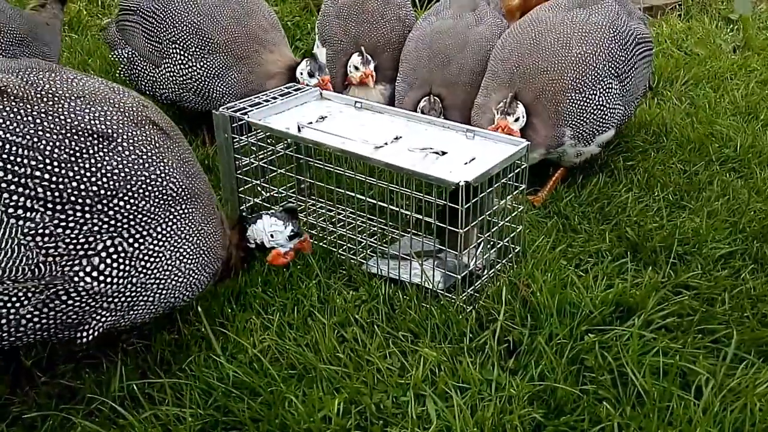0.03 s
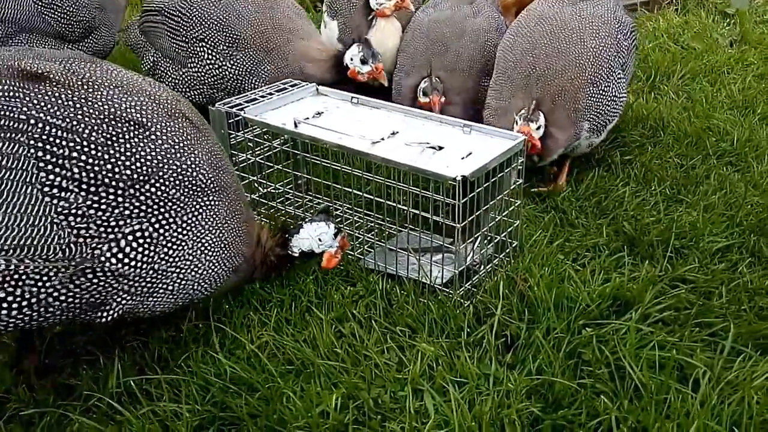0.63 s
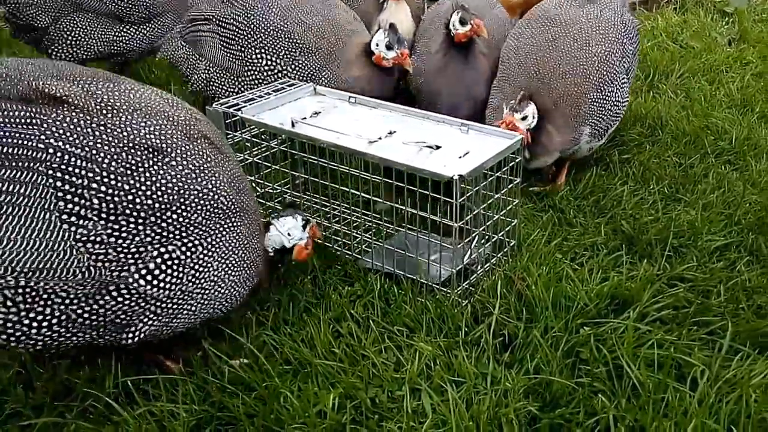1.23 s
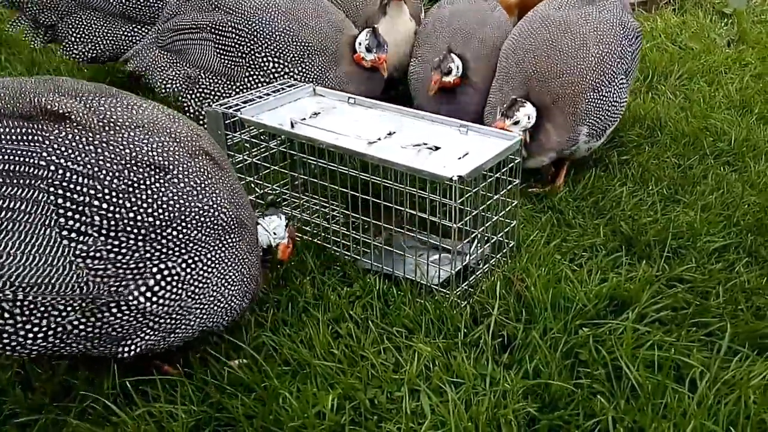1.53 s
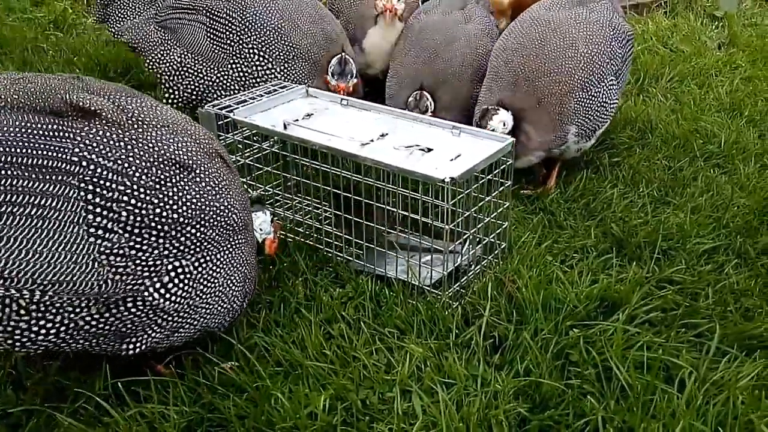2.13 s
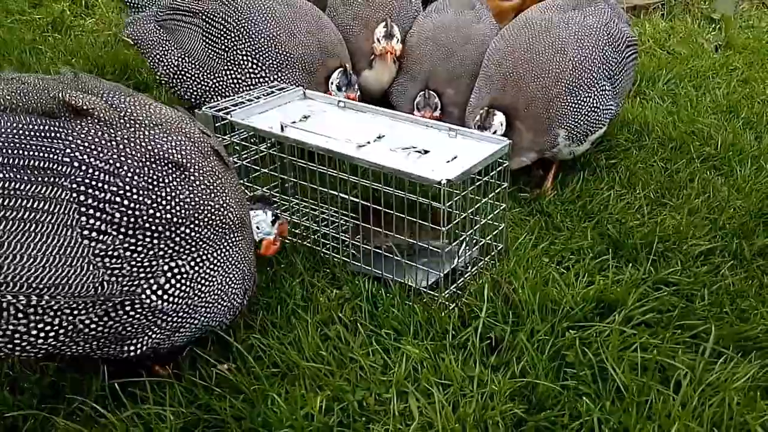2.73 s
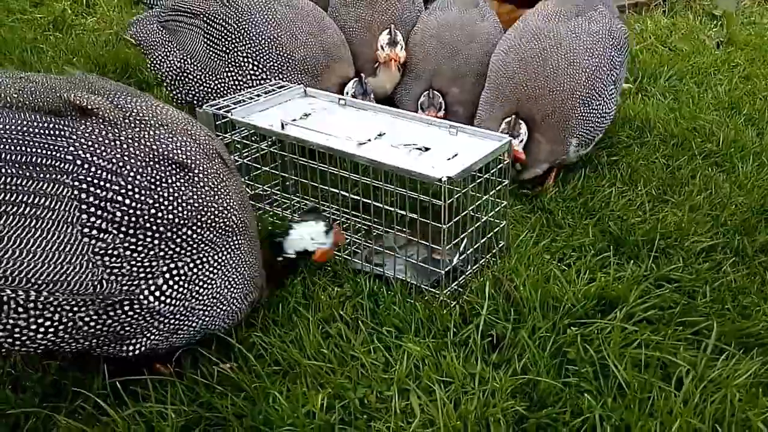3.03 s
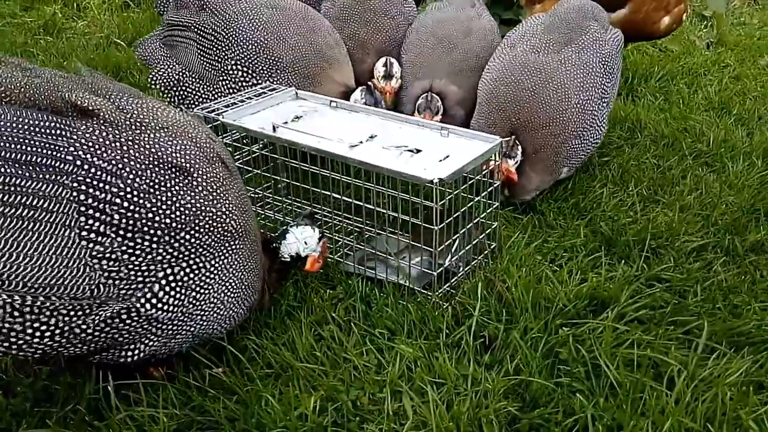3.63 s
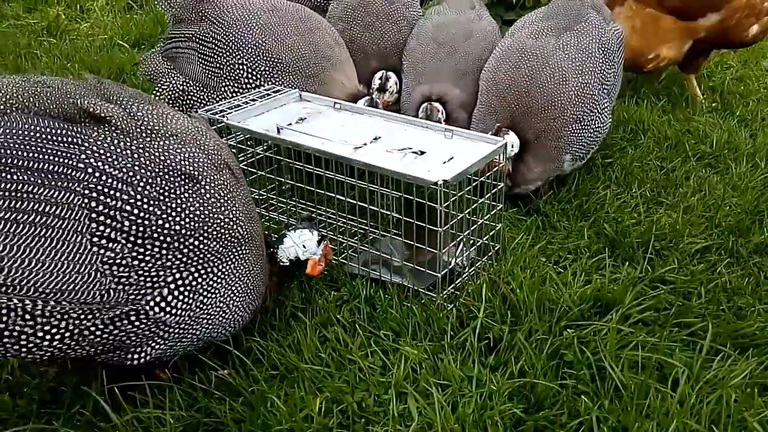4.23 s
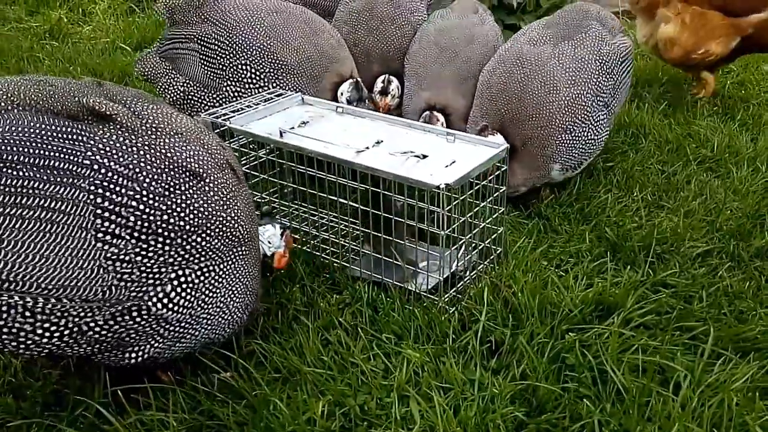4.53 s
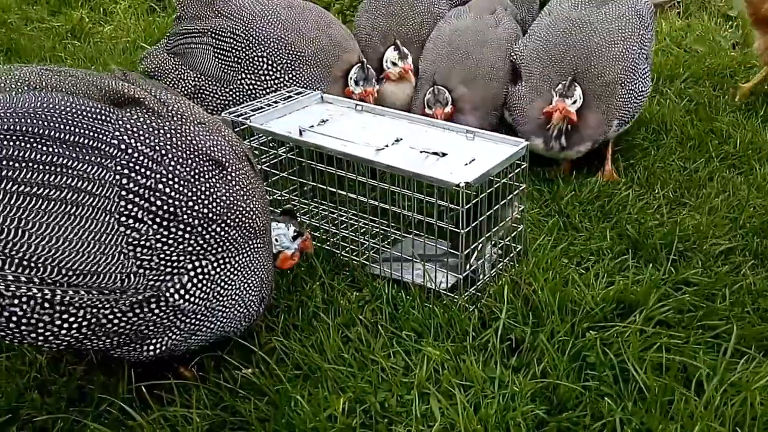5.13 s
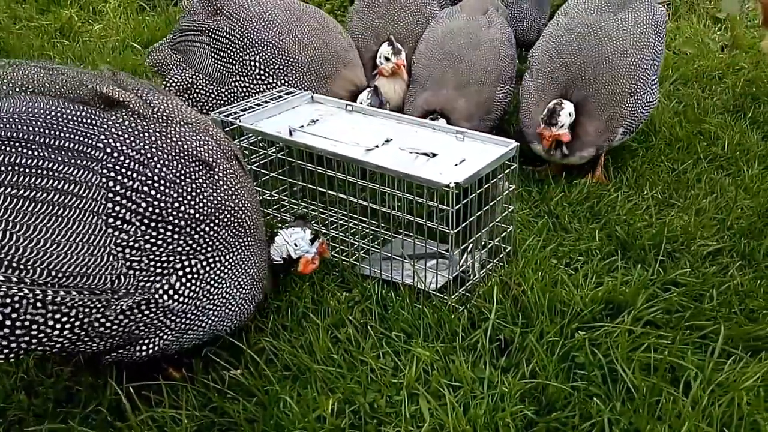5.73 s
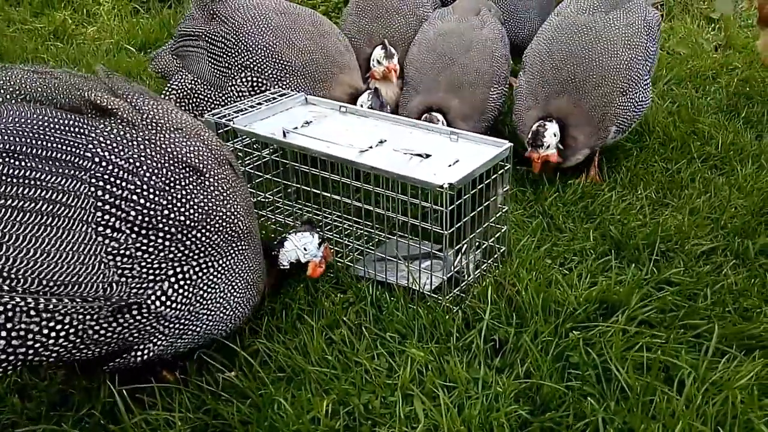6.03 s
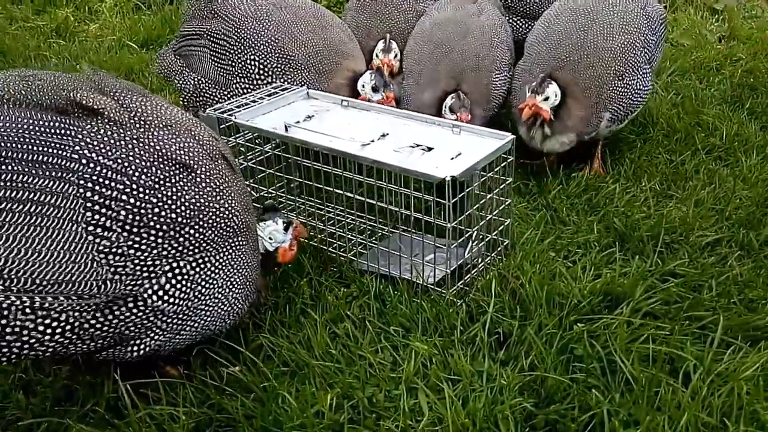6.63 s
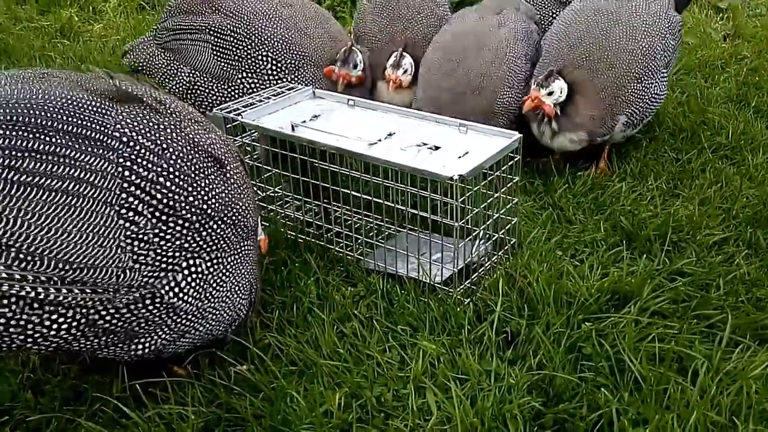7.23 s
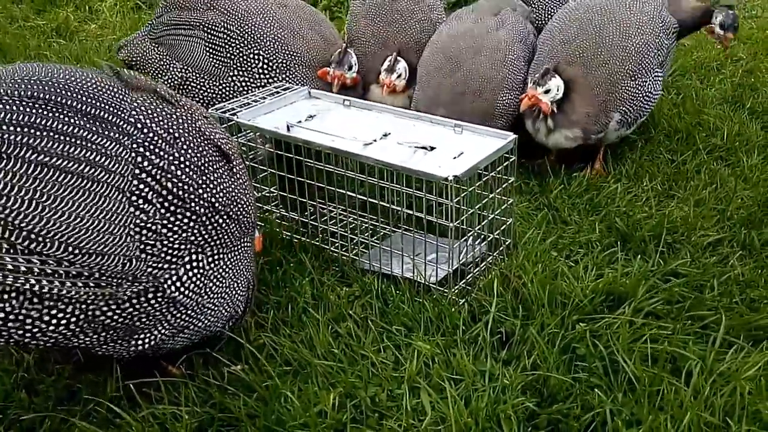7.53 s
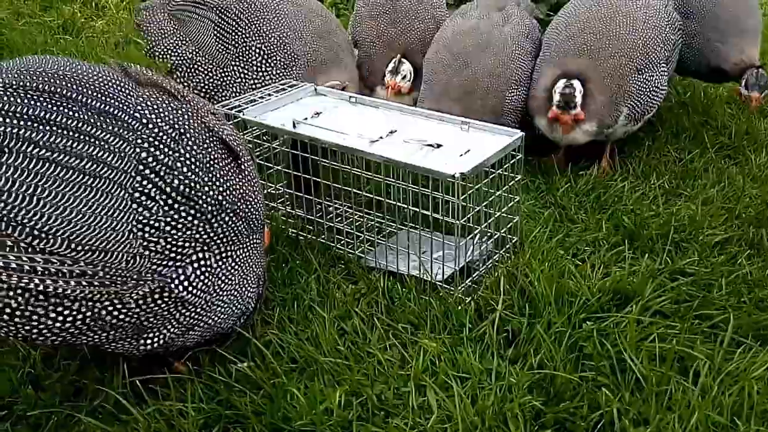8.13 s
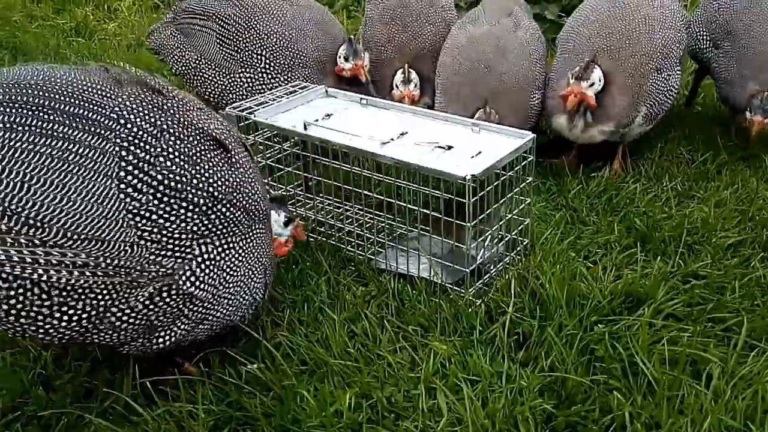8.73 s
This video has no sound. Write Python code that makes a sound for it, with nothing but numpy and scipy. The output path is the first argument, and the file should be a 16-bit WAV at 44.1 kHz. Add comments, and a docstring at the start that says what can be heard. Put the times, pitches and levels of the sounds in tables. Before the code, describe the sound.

Outdoors, over a quiet rumble and hiss, a few guinea fowl make scattered thin peeps, falling chirps and a couple of quick rising whistles. Now and then a beak snaps at grass or ticks against a wire cage. Wind buffets the microphone in several clusters of short, dull thumps that stand above everything else, while faint moaning calls come and go far away.

```python
"""Guinea fowl round a wire cage

The birds crowd on a lawn, whistling soft chirps that turn raspy when their voice boxes flutter.
A few low clucks ring in their throats, feet shuffle, and beaks snatch at grass and wire.
Puffs of air buffet the microphone; far-off moaning calls swell over a faint rumble, drone and hiss."""
import sys
import numpy as np
from scipy import signal
from scipy.fft import rfft, irfft, next_fast_len
from scipy.io import wavfile
from scipy.ndimage import uniform_filter1d, map_coordinates

SR = 44100
rng = np.random.default_rng(int(sys.argv[2]) if len(sys.argv) > 2 else 0)


def digitize_waveform(pressure):
    """Quantize a signal to 16-bit integers and store it at the path in sys.argv[1].

    Rows of a 2-D input are taken as channels; values are limited to [-1, 1].
    """
    field = np.atleast_2d(pressure).T
    bounded = np.clip(field, -1, 1)
    quanta = np.round(bounded * 32767).astype(np.int16)
    wavfile.write(sys.argv[1], SR, quanta)


N = 388080
TIME = np.arange(N) / SR


def from_db(db):
    """Turn decibels into a volume multiplier."""
    return 10 ** (np.asarray(db) / 20)


def unit_power(x):
    """Scale a sound to an average power of one."""
    return x / np.sqrt(np.mean(x ** 2) + 1e-20)


def coloured(x, points):
    """Shape bass and treble along a curve of (frequency [Hz], gain [dB]) points."""
    hz, db = np.transpose(points)
    size = next_fast_len(len(x))
    bin_hz = np.maximum(np.arange(size // 2 + 1) * SR / size, 1)
    gain = from_db(np.interp(np.log(bin_hz), np.log(hz), db))
    return irfft(rfft(x, size) * gain, size)[:len(x)]


def noise(colour):
    """Noise with a given balance of bass and treble."""
    return unit_power(coloured(rng.standard_normal(N), colour))


def narrow_noise(hz, half_width):
    """A narrow band of noise, heard as a wavering tone."""
    edges_hz = [max(hz - half_width, 20), hz + half_width]
    band = signal.butter(2, edges_hz, "band", fs=SR, output="sos")
    return unit_power(signal.sosfilt(band, rng.standard_normal(N)))


def drift(rate, size):
    """A smooth random wobble, changing about rate times a second."""
    knots = rng.standard_normal(int(size / SR * 2 * rate) + 4)
    position = np.arange(size) / SR * 2 * rate + 1
    return unit_power(map_coordinates(knots, [position], order=3, mode="nearest"))


def swell(centre, spread):
    """A bell-shaped rise and fall around a moment in the scene."""
    return np.exp(-.5 * np.minimum(((TIME - centre) / spread) ** 2, 100))


def progress(length):
    """A ramp from 0 to 1 over a length in seconds."""
    return np.linspace(0, 1, int(length * SR))


def hump(along, peak_at):
    """Rise from 0 to 1 and fall back as along runs from 0 to 1."""
    angle = np.pi * np.interp(along, [0, np.clip(peak_at, .1, .9), 1], [0, .5, 1])
    return np.abs(np.sin(angle))


def add(out, start, sound):
    """Mix a sound in at a start time in seconds."""
    at = max(0, int(start * SR))
    out[at:at + len(sound)] += sound[:N - at]


def resonance(x, hz, width):
    """Ring at one pitch, as a hollow space does."""
    r = np.exp(-np.pi * width / SR)
    feedback = [1, -2 * r * np.cos(2 * np.pi * hz / SR), r * r]
    return signal.lfilter(np.array([1, 0, -1]) * (1 - r * r) / 2, feedback, x + 1e-18)


# How loud the rumble is as time passes: (time [s], level [dB])
RUMBLE_LEVEL = [(0, -49.5), (.8, -49.5), (1.25, -46), (1.7, -49.5), (2.4, -48.5), (3.2, -44.5), (3.75, -48),
                (4.7, -44), (5.0, -48), (5.9, -48.5), (6.3, -43), (7.1, -50), (7.8, -46.5), (8.3, -47),
                (8.8, -46.5)]
# Tone colours of the rumble and the hiss: (frequency [Hz], gain [dB])
RUMBLE_COLOUR = [(20, -30.5), (40, -15.5), (65, -6.5), (98, -4), (119, -4.5), (142, -7), (200, -13.5),
                 (300, -22), (390, -25.5), (520, -20.5), (750, -38.5), (1500, -47)]
HISS_COLOUR = [(200, -7.5), (600, 7.5), (850, 4), (1200, 7.5), (1700, 2), (2700, -0.5), (4000, -3),
               (5600, -3.5), (8000, -7.5), (16000, -3.5)]

def background(waver_db=2.0, drone_hz=117.8, drone_db=-54, hiss_db=-58.5):
    """The outdoors: a slowly changing rumble, a distant drone and a faint hiss."""
    rumble_db = np.interp(TIME, *np.transpose(RUMBLE_LEVEL)) + waver_db * drift(5, N)
    drone = from_db(drone_db) * narrow_noise(drone_hz, half_width=3.6)
    return from_db(rumble_db) * noise(RUMBLE_COLOUR) + drone + from_db(hiss_db) * noise(HISS_COLOUR)


# Distant moans: (centre [s], spread to each side [s], pitch [Hz], level [dB])
FAR_CALLS = [(1.185, 0.12, 560, -54), (2.665, 0.35, 482, -58), (3.397, 0.19, 534, -53.5),
             (3.835, .13, 1187, -59), (4.41, 0.34, 462, -51), (5.166, 0.21, 478.5, -49.5),
             (5.6, 0.14, 491, -47.5), (6.077, 0.15, 544, -53), (7.607, 0.35, 398, -59),
             (8.724, 0.13, 1750, -60.5)]

def far_calls(smear_hz=76.2, smear_share=0.044, core_db=-2):
    """Each long note keeps a core of clear pitch; distance and many echoes smear the rest."""
    out = np.zeros(N)
    for centre, spread, hz, db in FAR_CALLS:
        smear = narrow_noise(hz, half_width=smear_hz + smear_share * hz)
        core = from_db(core_db) * narrow_noise(hz, half_width=18)
        out += from_db(db) * swell(centre, spread) * unit_power(smear + core)
    return out


def swirls(colour, lumpy_db):
    """Churning air: lumpy from instant to instant, but steady over a few swirls."""
    swirl = noise(colour) * from_db(lumpy_db * np.tanh(drift(110, N)))
    local_power = uniform_filter1d(uniform_filter1d(swirl ** 2, size=500), size=400)
    return unit_power(swirl / np.sqrt(np.abs(local_power) + .01))


# Tone colours of large, small and fine swirls of air: (frequency [Hz], gain [dB])
LARGE_SWIRLS = [(20, -27.5), (40, -16), (70, -2), (125, 2.5), (200, -7), (270, -13.5), (400, -30.5),
                (800, -69.5)]
SMALL_SWIRLS = [(120, -15.5), (220, -3), (310, 3), (450, -8), (720, -18.5), (1000, -37.5), (1600, -51),
                (3000, -65.5)]
FINE_SWIRLS = [(300, -25), (550, -2.5), (750, -1), (1050, -9), (1600, -23), (3000, -55)]
# Puffs of air: (start [s], hold [s], level [dB], extra churn [dB])
PUFFS = [(1.868, 0.051, -39, -9), (2.175, 0.055, -30, 3), (2.358, 0.059, -39, -0.5), (2.51, 0.03, -40, 0),
         (2.666, 0.033, -32, -1.5), (2.898, 0.011, -30.5, 0.5), (3.96, 0.047, -25, 1.5),
         (4.07, .01, -28, 2), (4.193, 0.029, -22.5, 3.5), (4.263, 0.15, -32.5, 3),
         (4.331, 0.0078, -25, 0.5), (5.52, 0.0042, -36.5, 6), (6.156, 0.016, -26.5, -0.5),
         (6.492, 0.037, -37, 5), (6.633, 0.023, -32.5, 3.5), (6.686, .048, -20, -1.5),
         (6.765, 0.037, -23, -0.5), (6.846, 0.012, -22, -1), (6.938, 0.013, -30.5, -4),
         (7.224, 0.0088, -26.5, 4), (8.081, 0.096, -34.5, -4.5), (8.489, .07, -37, 1.5),
         (8.581, 0.019, -23, -1.5)]

def puffs(rise_s=0.0038, fall_s=0.0074, wake_db=-13.5, wake_s=0.071, firm_puff_db=-22.5):
    """Each puff hits the microphone, holds and dies; the more it churns, the brighter it sounds."""
    flow_power, churn_power = np.zeros((2, N))
    for start, hold, db, churn_db in PUFFS:
        before, after = np.maximum(start - TIME, 0), np.maximum(TIME - start - hold, 0)
        core = np.exp(-np.minimum(before / rise_s + after / fall_s, 20))
        # weaker stirred air surrounds the puff
        wake = from_db(wake_db) * np.exp(-np.minimum((before + after) / wake_s, 20))
        power = from_db(db - firm_puff_db) ** 2 * (core ** 2 + wake ** 2)
        flow_power += power
        churn_power += power * from_db(churn_db) ** 2
    flow, churn = np.sqrt(flow_power), np.sqrt(churn_power)
    thump = from_db(-0.5) * flow * swirls(LARGE_SWIRLS, lumpy_db=-1.0)
    knock = from_db(-10) * churn ** 1.51 * swirls(SMALL_SWIRLS, lumpy_db=11.0)
    # the finest swirls break loose only in the roughest puffs
    flutter = from_db(-30.5) * churn ** 3.25 * swirls(FINE_SWIRLS, lumpy_db=6.5)
    return from_db(firm_puff_db) * (thump + knock + flutter)


def yard_echoes(x, echo_db=-19, fade_s=0.11):
    """Add weak, scattered echoes from the cage, the birds and the fence."""
    age = TIME[:SR // 3]
    tail = rng.standard_normal(len(age)) * from_db(-60 * age / fade_s) * (age > .003)
    return x + from_db(echo_db) * signal.fftconvolve(x, tail / np.sqrt(np.sum(tail ** 2)))[:N]


# Shuffling feet: (centre [s], spread to each side [s], level [dB])
STEPS = [(1.88, 0.028, -51), (2.073, 0.01, -50.5), (2.32, 0.012, -54.5), (2.559, 0.0075, -48.5)]

def steps():
    """Feet press the grass with a dull rustle."""
    press = sum(from_db(db) * swell(centre, spread) for centre, spread, db in STEPS)
    return press * noise([(300, 1.5), (700, 7.5), (1200, 2), (1900, -8), (4000, -9), (10000, -20)])


# Ringing notes of the cage wires: (pitch [Hz], level [dB], time to fade 60 dB [s])
WIRES = [(990, -12, 0.1), (2880, 4.5, 0.22), (3700, 6, 0.15), (4070, 12, 0.076), (5530, -24, .1),
         (6708, -12, .17), (12630, 3, 0.24)]
# Tone colour of tearing grass: (frequency [Hz], gain [dB])
TEAR_COLOUR = [(300, -14), (700, 3.5), (1050, 9), (1900, -5.5), (2800, 5), (4000, 2), (5600, 3.5),
               (8000, -5), (11000, -7.5), (16000, -2.5)]
# Beak snatches: (time [s], level [dB], time to fade 60 dB [s], extra treble [dB])
SNATCHES = [(0.747, -56, 0.11, 13.5), (1.2276, -45, .06, 15), (1.252, -53.5, 0.17, -2),
            (2.287, -51.5, 0.014, 8), (2.531, -50.5, .008, 4), (4.7112, -39, 0.17, 4.5),
            (6.155, -55.5, .08, 17), (8.2143, -46.5, 0.065, 8), (8.56, -54, 0.063, 11),
            (8.608, -57.5, 0.094, 10)]

def snatches(hold_share=0.12, settle_db=-11, settle_stretch=2.4, wire_db=-15, grain_db=2.0):
    """Grass tears with a sudden crackle, then settles; hard snatches set the cage wires ringing."""
    force, crispness, knocks = np.zeros((3, N))
    age = TIME[:SR // 2]
    hardest_db = max(row[1] for row in SNATCHES)
    for start, db, fade_s, treble_db in SNATCHES:
        tear = from_db(db - 60 * np.maximum(age / fade_s - hold_share, 0))
        settle = from_db(db + settle_db - 60 * age / (fade_s * settle_stretch))
        add(force, start, np.hypot(tear, settle))
        add(crispness, start, tear * from_db(treble_db))
        # a softer snatch passes a smaller share of its force to the wires
        add(knocks, start, tear[:1] * from_db(wire_db + 0.62 * (db - hardest_db)))
    grains = rng.standard_normal(N) * from_db(grain_db * drift(700, N))
    crackle = unit_power(coloured(grains, TEAR_COLOUR))
    treble = coloured(crackle, [(3000, -40), (9000, 0)])
    ring = sum(from_db(db - 60 * age / fade_s) * np.sin(2 * np.pi * hz * age)
               for hz, db, fade_s in WIRES)
    return force * (crackle - treble) + crispness * treble + signal.fftconvolve(knocks, ring)[:N]


# Where the throat rings: (frequency [Hz], width [Hz], gain [dB])
THROAT = [(695, 110, 13), (1037, 130, 7), (1230, 130, 1.5), (1610, 82, 1)]
# Low clucks: (start [s], length [s], pulse rate [Hz], level [dB])
CLUCKS = [(2.854, 0.028, 177.6, -48), (3.04, 0.021, 197, -44), (5.284, 0.013, 213.4, -44.5)]

def clucks(fade_db=-7, breath=0.082, wobble=0.049):
    """A handful of uneven, weakening pulses make the throat ring."""
    out = np.zeros(N)
    for start, length, rate, db in CLUCKS:
        size = int(length * SR)
        cycles = np.cumsum(rate * (1 + wobble * drift(186, size))) / SR
        pulses = np.diff(np.floor(cycles), prepend=-1) + breath * rng.standard_normal(size)
        source = np.pad(pulses * from_db(np.linspace(0, fade_db, size)), (0, size))
        voice = sum((-1) ** k * from_db(gain_db) * resonance(source, hz, width)
                    for k, (hz, width, gain_db) in enumerate(THROAT))
        add(out, start, from_db(db) * unit_power(voice) / np.sqrt(2))
    return out


def voice_box(hz, rasp, octave_db, wobble=0.0082, flutter_hz=441, hoarse_db=4.5):
    """A gliding whistle; a thin skin in the voice box flutters unevenly and makes it raspy."""
    size = len(hz)
    shaky_hz = hz * (1 + wobble * (1 + 4 * rasp) * drift(250, size))
    phase = 2 * np.pi * np.cumsum(shaky_hz) / SR
    whistle = np.sin(phase) + from_db(octave_db) * np.sin(2 * phase)
    flutter_rate = flutter_hz * (1 + .12 * drift(80, size))
    flutter = np.cos(2 * np.pi * np.cumsum(flutter_rate) / SR)
    hoarseness = from_db(hoarse_db * rasp * drift(133, size))
    return unit_power(whistle * (1 + 2 * rasp * flutter) * hoarseness)


def open_beak(voice, boost_db=9.5):
    """The open beak boosts the overtones near the pitch at which it rings."""
    return voice + from_db(boost_db) * resonance(voice, hz=5000, width=350)


# Soft falling chirps of the near birds: (start [s], length [s], first pitch [Hz], level [dB])
FALLING_CHIRPS = [(.765, 0.11, 2750, -63), (1.048, 0.08, 3010, -61), (3.532, 0.069, 2930, -55.5),
                  (3.964, 0.087, 2850, -54), (4.226, 0.074, 2900, -58), (5.097, 0.06, 2500, -66),
                  (5.455, 0.068, 2450, -62), (5.765, 0.078, 2650, -67), (5.96, 0.093, 2630, -65),
                  (7.57, 0.061, 2780, -61.5), (8.249, 0.079, 2930, -61.5)]

def falling_chirps(fall_octaves=.33, full_rasp=0.63, flock_gap_s=.55, flock_hz=2666, flock_db=-67):
    """Raspy notes sag in pitch as they fade; the rest of the flock adds fainter ones at random."""
    out = np.zeros(N)
    flock = []
    for k, (when, pitch) in enumerate(rng.random(size=(30, 2))):
        octaves = 0.107 * (2 * pitch - 1)
        flock.append(((k + when) * flock_gap_s, 0.041, flock_hz * 2 ** octaves, flock_db))
    for start, length, first_hz, db in list(FALLING_CHIRPS) + flock:
        if start < N / SR:
            along = progress(length)
            hz = first_hz * 2 ** (-fall_octaves * along)
            rasp = full_rasp * np.minimum(along / 0.13, 1)   # starts clean, soon turns raspy
            effort = hump(along, peak_at=0.14) ** 0.65
            add(out, start, from_db(db) * effort * voice_box(hz, rasp, octave_db=-18))
    return out


# Rising whistles: (start [s], length [s], level [dB], strongest push at [share of length])
RISING_WHISTLES = [(0.341, .041, -46.5, 0.8), (6.751, 0.034, -38, .33)]

def rising_whistles(from_hz=2350, to_hz=4050, fade_db=-9, rasp=0.43):
    """Whistles climb ever faster, thinning and turning raspy as they rise."""
    out = np.zeros(N)
    for start, length, db, peak_at in RISING_WHISTLES:
        along = progress(length)
        climb = along ** 1.3
        hz = from_hz + (to_hz - from_hz) * climb
        loudness = from_db(db + fade_db * climb) * hump(along, peak_at) ** 1.34
        add(out, start, loudness * voice_box(hz, rasp * climb ** 2, octave_db=-21))
    return out


# Peeps: (start [s], length [s], top pitch [Hz], top at [share of length], level [dB], rasp [0-1])
PEEPS = [(0.038, 0.052, 2290, 0.43, -55, 0.16), (.398, 0.025, 2410, .5, -57.5, 0.3),
         (1.245, .02, 1890, .5, -53, .1), (2.88, 0.042, 2560, 0.6, -47.5, 0.4),
         (3.203, .032, 3210, 0.28, -40.5, 0), (3.498, .05, 2700, 0.4, -49, 0.15),
         (3.948, 0.028, 2750, 0.2, -47, .15), (5.332, 0.022, 1825, 0.6, -54.5, .1),
         (6.316, .036, 3000, .54, -39.5, 0.48), (7.869, 0.028, 1880, .55, -53, .25),
         (8.69, 0.066, 2660, 0.45, -55.5, 0.2)]

def peeps(rest_hz=1597, edge_share=.41, burst_db=32):
    """The pitch arches up and back; a raspy peep bursts out at its top, with soft, clean ends."""
    out = np.zeros(N)
    for start, length, top_hz, top_at, db, rasp in PEEPS:
        along = progress(length)
        arch = hump(along, top_at) ** 1.7
        # starts and ends part of the way from the resting pitch to the top
        hz = rest_hz + (top_hz - rest_hz) * (edge_share + (1 - edge_share) * arch)
        burst = from_db(-burst_db * rasp * (1 - arch) ** 2)
        effort = hump(along, peak_at=0.61) ** 0.73 * burst
        add(out, start, from_db(db) * effort * voice_box(hz, rasp * arch, octave_db=-25))
    return out


def scene():
    """Mix the near birds and their echoes with far calls, puffs of air and the background."""
    chirps = open_beak(peeps() + rising_whistles() + falling_chirps())
    birds = chirps + clucks() + snatches() + steps()
    return (yard_echoes(birds) + far_calls() + puffs() + background())[None]


# How strongly the microphone picks up each frequency: (frequency [Hz], gain [dB])
MICROPHONE = [(20, 1.5), (6500, -1), (7300, -8), (8300, -14), (10000, -16), (12500, -15.5), (13900, -25),
              (14700, -5.5), (15400, -9.5), (15700, -20)]

def record(dry, cutoff_hz=15700):
    """The microphone dulls the treble, has a peak near the very top and cuts everything above."""
    heard = coloured(dry[0], MICROPHONE)
    low_pass = signal.ellip(10, .1, 80, cutoff_hz, fs=SR, output="sos")
    return signal.sosfilt(low_pass, heard)[None]


dry = scene()
out = record(dry)
digitize_waveform(out)
```